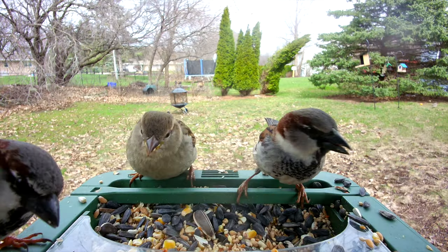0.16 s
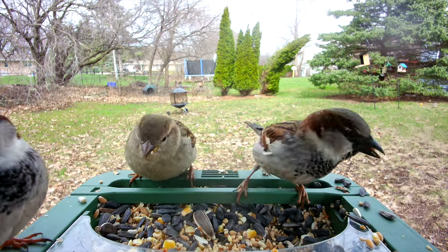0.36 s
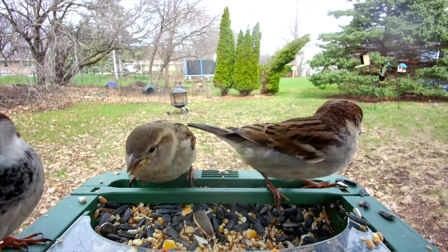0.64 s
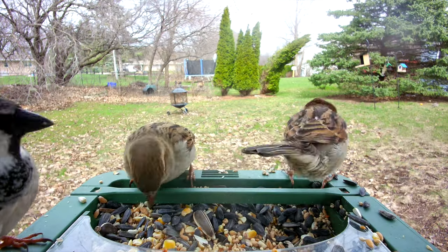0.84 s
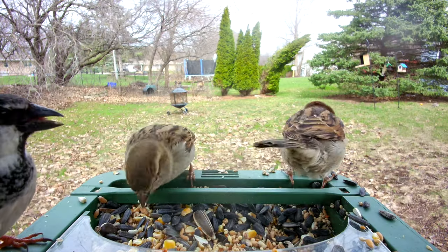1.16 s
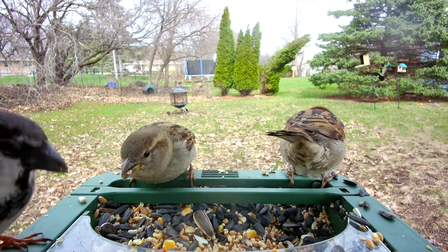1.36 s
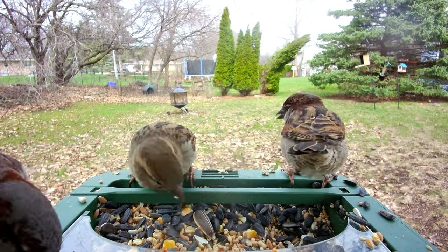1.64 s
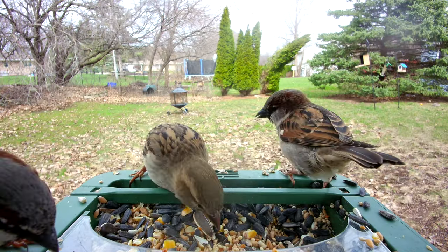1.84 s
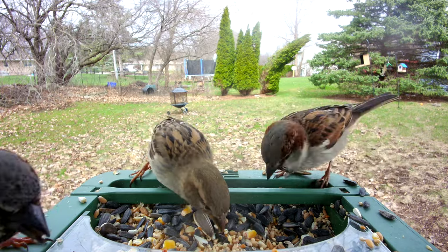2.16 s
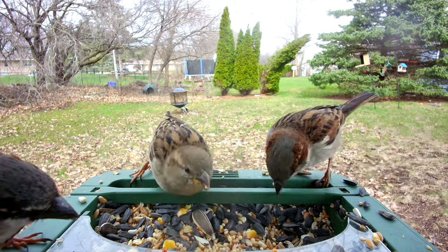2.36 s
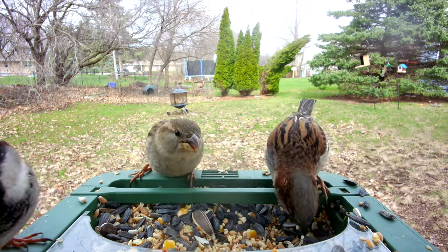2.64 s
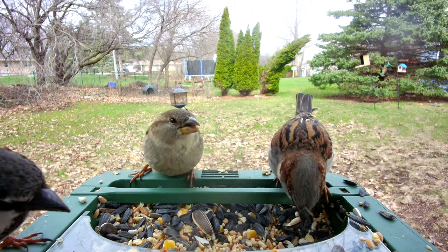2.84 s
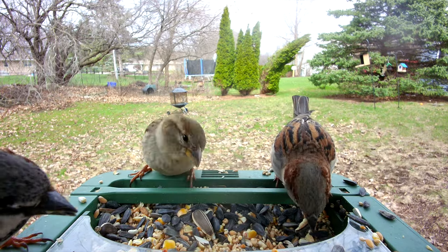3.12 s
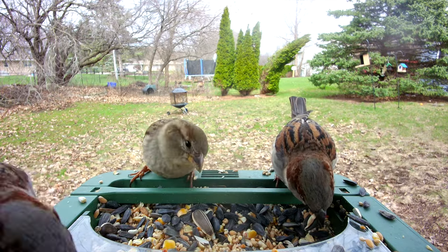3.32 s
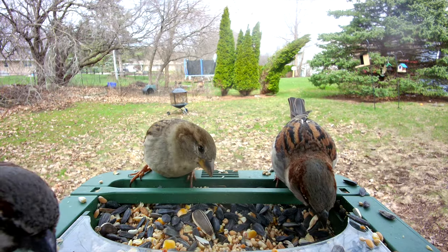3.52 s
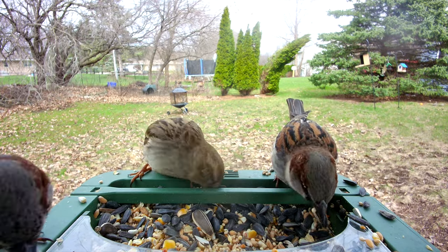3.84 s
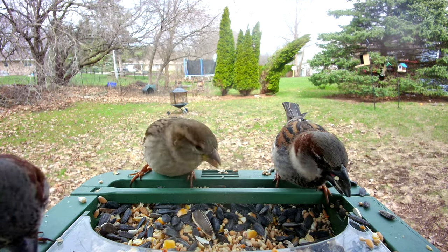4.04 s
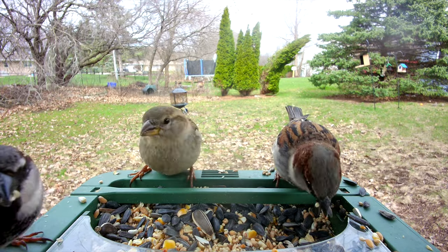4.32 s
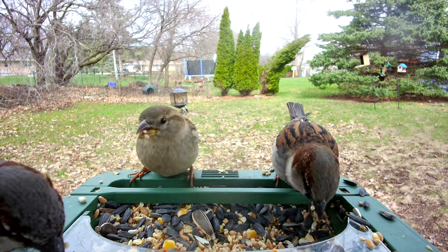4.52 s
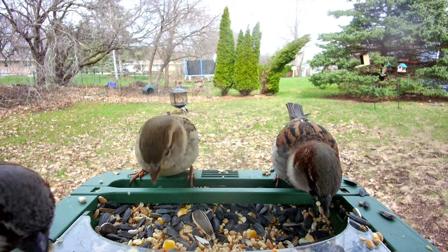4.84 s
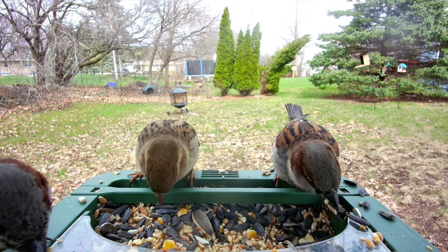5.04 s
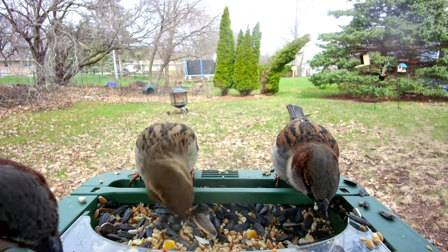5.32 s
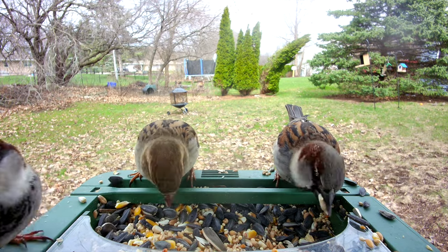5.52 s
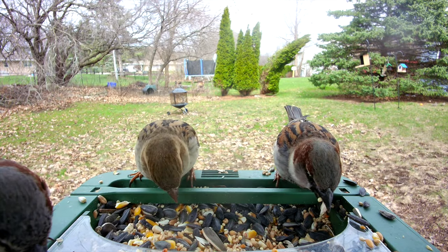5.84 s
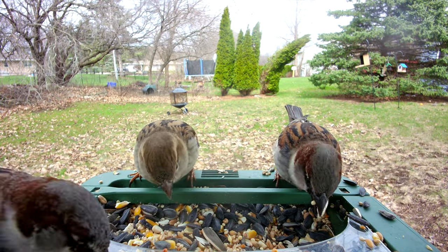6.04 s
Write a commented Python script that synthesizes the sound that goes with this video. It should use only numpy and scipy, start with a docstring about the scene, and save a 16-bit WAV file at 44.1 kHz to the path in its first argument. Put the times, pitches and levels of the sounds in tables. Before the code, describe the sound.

Close to a small microphone in a plastic feeder, sparrows snap seed husks in irregular dry clicks over faint nibbling. Wings flutter briefly and claws scrape the rim. Further off, songbirds whistle and warble early on, and a faint trill comes at the end. Distant traffic rumble, engine drone and soft open-air hiss run throughout. A moderate tray knock comes late, then one hard peck that cracks and rattles the housing.

```python
"""Traffic rumble, an engine drone and open-air hiss come first and last throughout: three coloured noises.
Sparrows feed on a plastic tray with a small microphone in its housing: beaks snap seed (filtered bursts),
pecks ring the tray (decaying sines), and one hard peck rattles the housing (coloured noise decays).
Wings flutter and claws scrape (shaped grainy noise).
Songbirds whistle, warble and trill further off (gliding sines with echoes)."""
import sys
import numpy as np
from scipy import signal
from scipy.fft import rfft, irfft, next_fast_len
from scipy.io import wavfile
from scipy.ndimage import uniform_filter1d

SR = 44100
rng = np.random.default_rng(int(sys.argv[2]) if len(sys.argv) > 2 else 0)


def wav_out(sig):
    """Save sig, one row per channel (or a flat mono array), as 16-bit PCM at SR to the path in sys.argv[1]."""
    wavfile.write(sys.argv[1], SR, np.round(np.clip(np.atleast_2d(sig).T, -1, 1) * 32767).astype(np.int16))


N = 272538
TIME_S = np.arange(N) / SR


def undb(db):
    """Decibels to amplitude gain."""
    return 10 ** (np.asarray(db) / 20)


def unit(x):
    """Scale to an rms of one."""
    return x / np.sqrt(np.mean(x ** 2))


def burst(x):
    """Scale a transient to the energy of one millisecond at unit rms."""
    return x / np.sqrt(np.sum(x ** 2) / (SR / 1000))


def add(out, start_s, x):
    """Mix x into out from start_s on."""
    i = int(np.clip(start_s * SR, 0, N - 1))
    out[i:i + len(x)] += x[:N - i]


def fade(t, t60_s):
    """Exponential decay of 60 dB in t60_s."""
    return np.exp(-np.log(1000) * t / t60_s)


def swell(centre_s, half_s):
    """Gaussian bell around centre_s; half_s is its standard deviation."""
    return np.exp(-((TIME_S - centre_s) / half_s) ** 2 / 2)


def lowpass(x, hz, order=1):
    """Butterworth low-pass."""
    return signal.sosfilt(signal.butter(order, hz, fs=SR, output="sos"), x)


def resonate(x, hz, q):
    """One two-pole resonance."""
    return signal.lfilter(*signal.iirpeak(hz, q, fs=SR), x)


def colour(x, points):
    """Minimum-phase filter through (frequency [Hz], gain [dB]) points, via the folded cepstrum."""
    hz, db = np.transpose(points)
    size = next_fast_len(len(x)) * 2
    log_hz = np.log(np.maximum(np.fft.rfftfreq(size, 1 / SR), 1))
    gain = undb(np.interp(log_hz, np.log(hz), db))
    cepstrum = irfft(np.log(gain))
    cepstrum[1:size // 2] *= 2
    cepstrum[size // 2 + 1:] = 0
    response = np.exp(rfft(cepstrum))
    return irfft(rfft(x, size) * response)[:len(x)]


def noise(points):
    """Steady noise of the given colour, unit rms."""
    return unit(colour(rng.standard_normal(N), points))


def walk(rate_hz):
    """Smoothed random steps, rate_hz per second, unit rms."""
    k = int(SR / rate_hz)
    steps = np.repeat(rng.standard_normal(N // k + 1), k)
    return unit(uniform_filter1d(steps, k)[:N])


# rumble spectrum: (frequency [Hz], relative density [dB])
RUMBLE_SPECTRUM = [(15, -9), (28, -4), (45, -1.5), (60, -4), (80, -2.5), (105, -12), (140, -13),
                   (300, -61.5)]
# rumble level: (time [s], level [dB])
RUMBLE_LEVEL = [(0, -46), (1.2, -49), (2.6, -49), (4.2, -53.5), (5.2, -51.5), (5.6, -48.5), (6.18, -52.5)]


def traffic(wander_db=1.5):
    """Distant traffic: low noise on a slow level curve, wandering."""
    level_db = np.interp(TIME_S, *np.transpose(RUMBLE_LEVEL)) + wander_db * walk(8)
    return noise(RUMBLE_SPECTRUM) * undb(level_db)


# drone spectrum: (frequency [Hz], relative density [dB])
DRONE_SPECTRUM = [(70, -23.5), (115, -8), (160, 1), (205, -1.5), (250, -10), (310, -28.5), (600, -47.5)]
# drone level: (time [s], level [dB])
DRONE_LEVEL = [(0, -52.5), (.6, -51.5), (1.03, -46.5), (1.5, -50.5), (2.35, -50.5), (2.72, -47.5),
               (3.5, -63), (4.2, -56.5), (5.45, -61), (6.18, -59)]


def engine(wander_db=1.03):
    """Distant engine: a band of noise that rises and sinks with its level curve."""
    level_db = np.interp(TIME_S, *np.transpose(DRONE_LEVEL)) + wander_db * walk(9)
    return noise(DRONE_SPECTRUM) * undb(level_db)


# air spectrum: (frequency [Hz], relative density [dB])
AIR_SPECTRUM = [(150, -2), (300, 9.5), (450, 4), (750, 0), (950, 2.5), (1150, 5.5), (1300, 3), (1450, 0),
                (1900, -1.5), (3200, -5), (4500, -11.5), (6000, -11), (7100, -8.5), (7900, -33)]


def open_air(level_db=-60, flicker_db=1.39):
    """Open-air hiss: broad noise with a flickering level."""
    return noise(AIR_SPECTRUM) * undb(level_db + flicker_db * walk(8.6))


def garden():
    """Steady background: rumble, drone and hiss add up."""
    return traffic() + engine() + open_air()


def trees(x, t60_s):
    """A house wall throws a call back once; trunks scatter it into a short tail."""
    t = np.arange(SR // 2) / SR
    echoes = rng.standard_normal(len(t)) * fade(t, t60_s) * (t > .008)
    echoes /= np.linalg.norm(echoes)
    echoes[int(.019 * SR)] += .45  # wall
    return signal.fftconvolve(x, echoes)[:N]


def voice(hz, gain, overtone):
    """Nearly sinusoidal bird tone: wavering pitch and level, optional second partial."""
    size = len(hz)
    bend = 1 + .007 * walk(40)[:size] + .012 * walk(450)[:size]
    phase = 2 * np.pi * np.cumsum(hz * bend) / SR
    gain = gain * undb(3 * walk(200)[:size]) * signal.windows.tukey(size, .15)
    return np.sqrt(2) * gain * (np.sin(phase) + overtone * np.sin(2 * phase))


def slur(length_s, first_hz, last_hz, db, arch_share=.028, waver_db=2.5, waver_hz=68):
    """Whistle gliding between two pitches, bowed upward mid-way, uneven in strength."""
    u = np.linspace(0, 1, int(length_s * SR))
    glide_hz = first_hz + (last_hz - first_hz) * u
    hz = glide_hz * (1 + arch_share * np.sin(np.pi * u))
    return voice(hz, undb(db + waver_db * walk(waver_hz)[:len(u)]), 0)


# slurred whistles: (time [s], length [s], first pitch [Hz], last pitch [Hz], level before song_db [dB])
WHISTLE_NOTES = [(0.815, 0.059, 4570, 3370, -52.5), (.872, .062, 3500, 2410, -55.5),
                 (1.099, .115, 4380, 6340, -61.5), (1.212, 0.057, 4980, 5600, -58),
                 (1.225, .092, 3554, 3855, -59), (1.324, 0.051, 3940, 4650, -53),
                 (1.333, 0.031, 3800, 2300, -55.5), (2.459, .09, 4550, 3350, -60.5),
                 (2.556, 0.065, 3050, 2080, -59.5), (2.629, .105, 5520, 4100, -64),
                 (2.732, 0.03, 3450, 2080, -56.5), (4.571, 0.073, 4150, 4500, -61),
                 (4.663, 0.043, 3250, 2390, -56)]


def whistles():
    """Separate slurred whistles, each a gliding tone."""
    out = np.zeros(N)
    for start_s, length_s, first_hz, last_hz, db in WHISTLE_NOTES:
        add(out, start_s, slur(length_s, first_hz, last_hz, db))
    return out


# warbled syllable: (time from its start [s], pitch [Hz], level before warble gains and song_db [dB],
# second partial relative to first [dB])
WARBLE_SYLLABLE = [(0, 2253, -69, 5), (0.021, 3150, -67, 0), (0.037, 2078, -56.5, -0.5),
                   (.05, 2550, -65, 3), (0.064, 3457, -58, -12), (.074, 2774, -49, -21),
                   (0.085, 2300, -58.5, -14)]


def warble(count=5, start_s=1.388, period_s=.123, first_db=-1.5, growth_db=0.6):
    """One syllable repeats evenly, growth_db louder each time."""
    out = np.zeros(N)
    at_s, *columns = np.transpose(WARBLE_SYLLABLE)
    t = np.arange(0, at_s[-1], 1 / SR)
    hz, db, overtone_db = (np.interp(t, at_s, c) for c in columns)
    for k in range(count):
        gain = undb(db + first_db + k * growth_db)
        add(out, start_s + k * period_s, voice(hz, gain, undb(overtone_db)))
    return out


# trill notes: (time into the period [s], first pitch [Hz], last pitch [Hz], level before growth [dB],
# growth over the trill [dB]); pitches before detuning
TRILL_NOTES = [(0, 4500, 4310, -76.5, 7), (.02, 3535, 2956, -66.5, 1)]


def trill(count=9, start_s=5.26, period_s=.104, note_s=.03, scatter_db=2.5, detune_share=.018):
    """A high and a low note alternate and grow, with random pitch and level each time."""
    out = np.zeros(N)
    for k in range(count):
        for offset_s, first_hz, last_hz, db, growth_db in TRILL_NOTES:
            detune = 1 + detune_share * rng.standard_normal(2)
            level_db = db + growth_db * (k + 1) / count + scatter_db * rng.standard_normal()
            note = slur(note_s, first_hz * detune[0], last_hz * detune[1], level_db)
            add(out, start_s + k * period_s + offset_s, note)
    return out


def songbirds(song_db=-3, near_echo_db=-5, far_echo_db=-2, echo_t60_s=0.41):
    """The song comes from one tree, the trill from a farther one with more echo."""
    near = undb(song_db) * (whistles() + warble())
    far = trill()
    near_echo = undb(near_echo_db) * trees(near, echo_t60_s)
    far_echo = undb(far_echo_db) * trees(far, echo_t60_s)
    return near + near_echo + far + far_echo


# tray and housing modes: (frequency [Hz], relative level before random shares [dB], t60 [s])
TRAY_MODES = [(320, -12.5, 0.11), (361.6, -3.5, 0.19), (407, -10.5, 0.023), (653, -17, 0.15),
              (833, -19.5, 0.22), (1034, -11.5, 0.14), (1100, -5, 0.16), (1460, -2.5, 0.064),
              (1702, 0.5, 0.044), (2300, -1, 0.039), (2690, 7, 0.015), (3100, 6.5, 0.028),
              (3360, -3, 0.084), (3730, -1.5, 0.047), (4750, 2, 0.054), (5360, -13, .08),
              (5954, 17.5, 0.029)]


def tray(x, share_db=1.0):
    """Plastic tray: decaying modes, shared out a little differently at each struck spot."""
    t = np.arange(len(x)) / SR
    shares = undb(share_db * rng.standard_normal(len(TRAY_MODES)))
    ring = np.zeros(len(x))
    for k, (hz, db, t60_s) in enumerate(TRAY_MODES):
        ring += (-1) ** k * shares[k] * undb(db) * fade(t, t60_s) * np.sin(2 * np.pi * hz * t)
    return signal.fftconvolve(x, ring)[:len(x)]


# feather spectrum: (frequency [Hz], relative density [dB])
FEATHER_SPECTRUM = [(120, 7), (300, -1.5), (550, 3.5), (750, -4), (1100, -2), (1700, -3), (3000, -5),
                    (5500, -2.5), (7500, -9.5)]


def feathers(grain_db=2.0, catch_db=2.5):
    """Feathers on seed: coloured noise made grainy by two fast level wanders."""
    level_db = grain_db * walk(900) + catch_db * walk(200)
    return unit(colour(rng.standard_normal(N) * undb(level_db), FEATHER_SPECTRUM))


def stroke(centre_s, half_s=0.01, settle_db=-5.5, settle_t60_s=0.29):
    """Level of one wing stroke: a quick swell, then the feathers settle."""
    settle = undb(settle_db) * (TIME_S > centre_s) * fade(np.abs(TIME_S - centre_s), settle_t60_s)
    return np.maximum(swell(centre_s, half_s), settle)


# wing bouts: (first stroke time [s], strokes [count], stroke spacing [s], first stroke level [dB],
# change per stroke [dB], treble corner [Hz])
WING_BOUTS = [(.554, 2, 0.027, -50.5, 2.5, 4500), (0.815, 1, .06, -42.5, 0, 4500),
              (1.987, 2, 0.035, -47, 0, 3500), (2.082, 2, 0.019, -49, 1, 3600),
              (2.298, 3, 0.0586, -47, -1, 2000), (2.611, 1, .06, -51, 0, 3500),
              (5.363, 3, 0.045, -43, -1.5, 3840), (5.514, 2, 0.073, -54, 1.5, 4320)]


def flutters(rustle, ring_db=-9):
    """Wing strokes gate the rustle and the tray ringing under it; stroke powers add."""
    out = np.zeros(N)
    brushing = rustle + undb(ring_db) * unit(tray(rustle))
    for first_s, strokes, gap_s, db, change_db, corner_hz in WING_BOUTS:
        power = np.zeros(N)
        for k in range(round(strokes)):
            power += (undb(db + k * change_db) * stroke(first_s + k * gap_s)) ** 2
        out += np.sqrt(power) * unit(lowpass(brushing, corner_hz, order=2))
    return out


# claws dragged over the rim: (peak time [s], squeak level [dB], bell standard deviation [s], squeak [Hz])
CLAW_SCRAPES = [(2.431, -49.5, 0.0034, 1620), (3.38, -45.5, 0.0016, 5660), (5.335, -47, 0.01, 4060),
                (5.38, -51, 0.004, 3300)]


def scrapes(rustle, rim_hz=1075, rim_db=-2):
    """Dragged claws: grainy noise excites a squeak and the ringing rim."""
    out = np.zeros(N)
    rim = undb(rim_db) * unit(resonate(rustle, rim_hz, 6.6))
    for peak_s, db, half_s, squeak_hz in CLAW_SCRAPES:
        squeak = unit(resonate(rustle, squeak_hz, 4.4))
        out += undb(db) * swell(peak_s, half_s) * (rim + squeak)
    return out


def scuffles():
    """Wings and claws share one grainy friction noise."""
    rustle = feathers()
    return flutters(rustle) + scrapes(rustle)


# housing crack spectrum: (frequency [Hz], gain [dB])
CRACK_SPECTRUM = [(500, -24.5), (1500, -11.5), (2600, -11), (3600, 2), (4300, -3.5), (4800, 3.5), (5900, 3),
                  (6600, 3.5), (8000, -11.5)]


def housing_crack(t, crack_t60_s=0.013, rattle_db=-7, rattle_t60_s=0.036):
    """Housing: a short crack plus a longer rattle, both decaying coloured noise."""
    contact, loose = rng.standard_normal((2, len(t)))
    crack = burst(colour(np.sign(contact) * fade(t, crack_t60_s), CRACK_SPECTRUM))
    rattle = burst(colour(loose * fade(t, rattle_t60_s), CRACK_SPECTRUM))
    return crack + undb(rattle_db) * rattle


# pecks on the tray: (time [s], body level before ring_db [dB], hardness: blow corner [Hz],
# crack level [dB])
TRAY_PECKS = [(0.81, -42, 3000, -37), (1.7418, -37, 1900, -43), (1.7485, -36, 833, -49),
              (2.094, -41.5, 2500, -39.5), (3.375, -46, 1170, -48), (4.6677, -29.5, 1800, -38.5),
              (4.6724, -37, 990, -57), (5.396, -34.5, 5030, -16), (5.4028, -34, 2540, -19),
              (5.4097, -32.5, 1830, -20), (5.508, -43, 3000, -36)]


def knocks(ring_db=5, thud_db=-7, thud_t60_s=0.031, peak_db=-4):
    """A blow rings the tray, softer ones mostly its low modes; hard ones crack and rattle the housing."""
    out, t = np.zeros(N), np.arange(SR // 4) / SR
    crack = housing_crack(t)  # same for every blow, so quick bounces buzz
    for start_s, db, corner_hz, crack_db in TRAY_PECKS:
        thud = resonate(rng.standard_normal(len(t)) * fade(t, thud_t60_s), 1400, 0.53)
        ring = tray(1. * (t == 0))
        body = lowpass(burst(ring) + undb(thud_db) * burst(thud), corner_hz, order=2)
        # modes matching the contact length take the most energy
        body = burst(body) + undb(peak_db) * burst(resonate(body, corner_hz, 1.9))
        add(out, start_s, undb(db + ring_db) * burst(body) + undb(crack_db) * crack)
    return out


def snap(hz, t60_s=.011, q=0.53, splinter_db=0, ring_db=-12, body_db=-12, give_s=0.0023):
    """A husk gives way: one sharp break, a spray of splinters, a faint ring of the tray."""
    t = np.arange(SR // 12) / SR
    strike = lowpass(1. * (t == t[SR // 2000]), 6500, order=4)
    spray = rng.standard_normal(len(t)) * fade(t, t60_s) * (1 - np.exp(-t / give_s))
    splinters = lowpass(spray, 7600, order=4)
    force = burst(strike) + undb(splinter_db) * burst(splinters)
    husk = resonate(resonate(force, hz, q), hz, 0.5)
    body = undb(body_db) * burst(resonate(force, 2500, 1.0))
    ring = undb(ring_db) * burst(tray(strike))
    sound = burst(husk) + body + ring
    # so small a thing radiates little bass
    return burst(sound - lowpass(sound, 800))


def nibbles(count=120, floor_db=-59, range_db=7, low_hz=3500, high_hz=6400):
    """Faint husk snaps at random times; the cube makes loud ones rare."""
    out = np.zeros(N)
    for when, size, pitch in rng.random((count, 3)):
        hz = low_hz + (high_hz - low_hz) * pitch
        add(out, when * N / SR, undb(floor_db + range_db * size ** 3) * snap(hz))
    return out


# clear beak clicks: (time [s], level before gain_db [dB], husk pitch [Hz])
BEAK_CLICKS = [(0.0813, -42.5, 3200), (0.172, -49, 5500), (0.4252, -31.5, 6030), (0.784, -43, 5000),
               (0.86, -35.5, 3660), (1.149, -42.5, 5930), (1.252, -40.5, 5300), (1.2658, -42, 3730),
               (1.3756, -30.5, 5800), (1.4688, -42.5, 3100), (1.8578, -45, 3240), (1.8711, -44.5, 3050),
               (2.173, -42, 5520), (2.2073, -36.5, 5570), (2.3706, -40, 2970), (2.693, -42.5, 4550),
               (2.8272, -32.5, 3200), (2.9287, -48, 3000), (3.49, -46, 3010), (3.5564, -38.5, 4780),
               (3.7052, -48, 4830), (3.7775, -38.5, 6300), (3.8773, -24.5, 3250), (3.9152, -33.5, 6200),
               (4.11, -45, 3300), (4.177, -39, 3940), (4.2262, -37, 4750), (4.284, -45.5, 2920),
               (4.3607, -47.5, 3490), (4.3949, -48, 4830), (4.79, -43, 3580), (4.908, -46, 2920),
               (5.032, -47.5, 3640), (5.2604, -44.5, 5540), (5.354, -30, 5520), (5.5734, -41.5, 3110),
               (5.5861, -36.5, 3100), (5.6523, -48, 5530), (5.686, -37, 3300)]


def pecking(gain_db=-2.0):
    """Beaks break husks: clear clicks over faint nibbling."""
    out = np.zeros(N)
    for start_s, db, hz in BEAK_CLICKS:
        add(out, start_s, undb(db + gain_db) * snap(hz))
    return out + nibbles()


def scene():
    """Everything as it reaches the feeder's microphone."""
    return (garden() + songbirds() + scuffles() + knocks() + pecking())[None]


def record(dry, ceiling=.3, soft_top_hz=6370, top_hz=7600):
    """The small recorder rounds the hardest peaks and cuts the top."""
    rounded = lowpass(ceiling * np.tanh(dry / ceiling), soft_top_hz, order=8)
    return signal.sosfilt(signal.ellip(6, .3, 70, top_hz, fs=SR, output="sos"), rounded)


dry = scene()
out = record(dry)
wav_out(out)
```